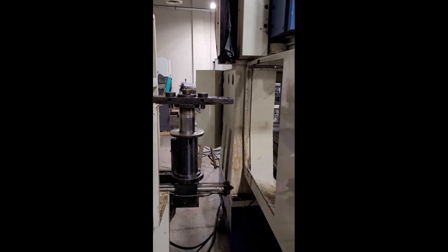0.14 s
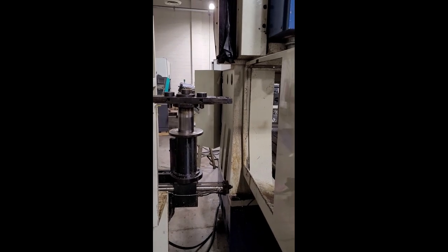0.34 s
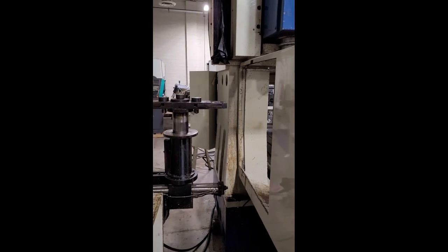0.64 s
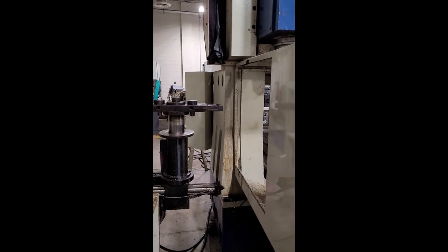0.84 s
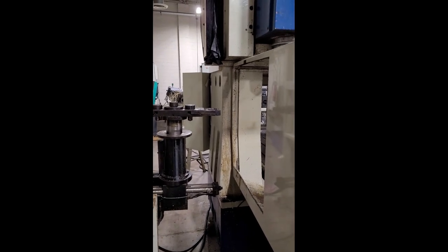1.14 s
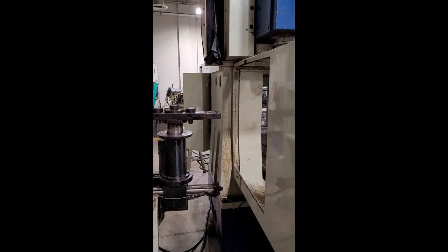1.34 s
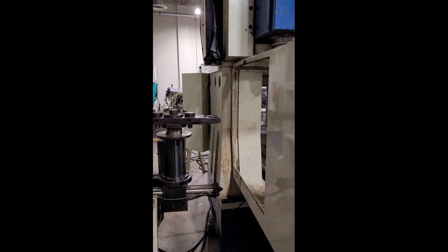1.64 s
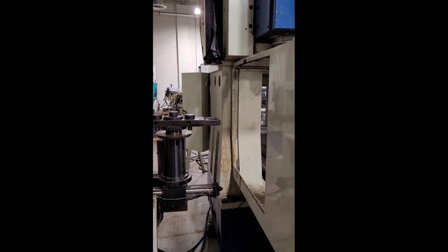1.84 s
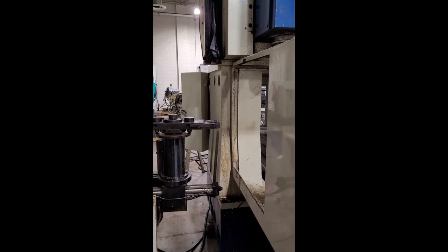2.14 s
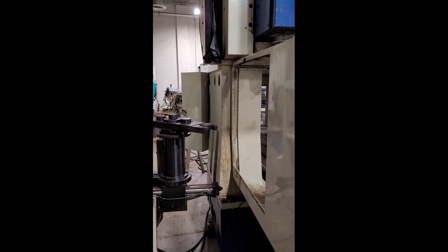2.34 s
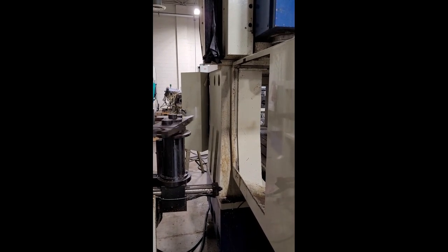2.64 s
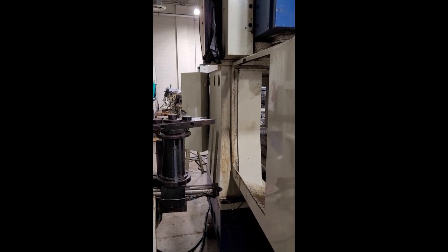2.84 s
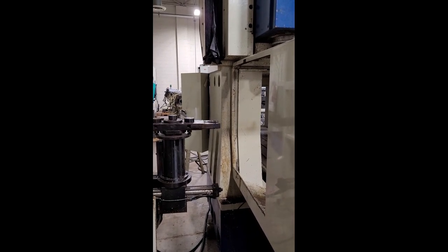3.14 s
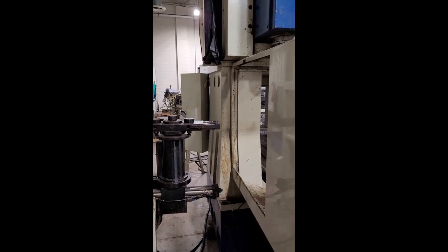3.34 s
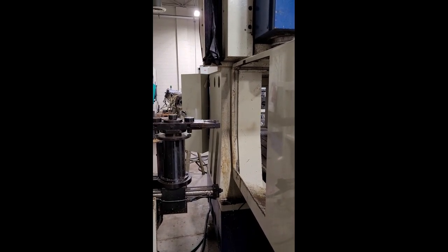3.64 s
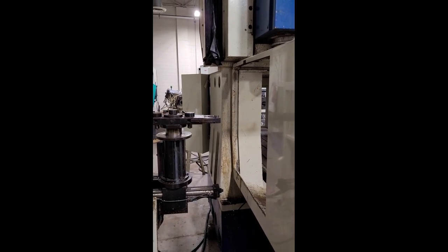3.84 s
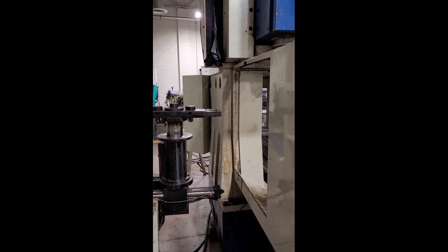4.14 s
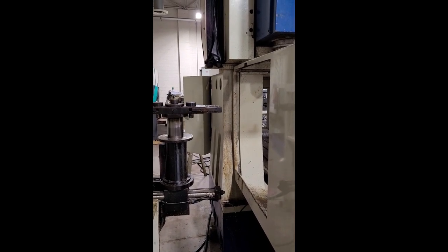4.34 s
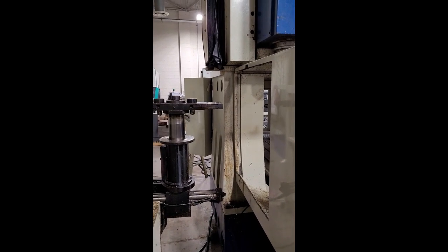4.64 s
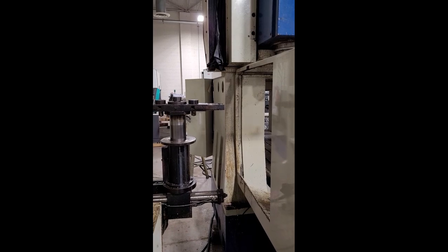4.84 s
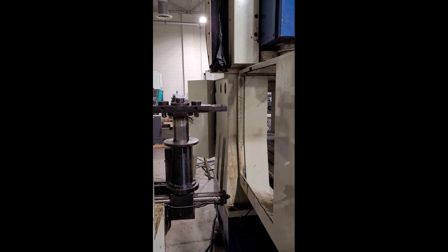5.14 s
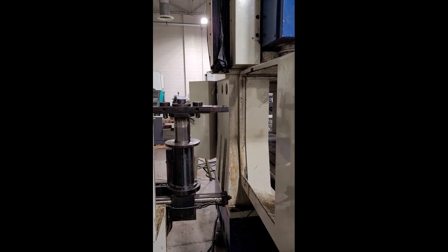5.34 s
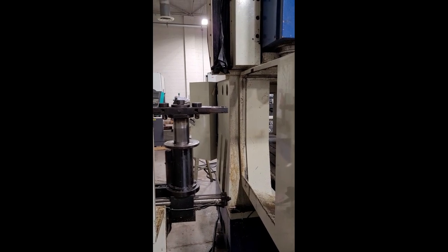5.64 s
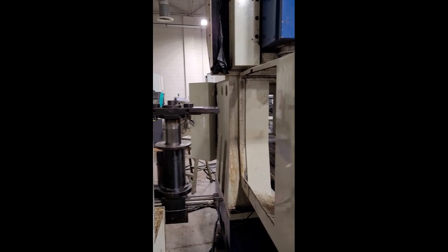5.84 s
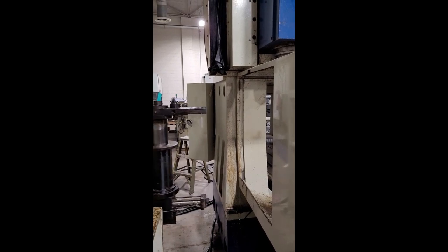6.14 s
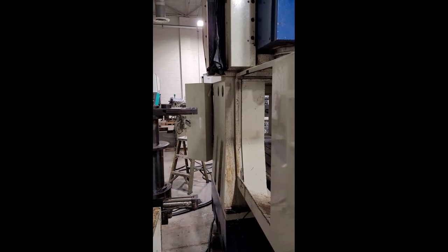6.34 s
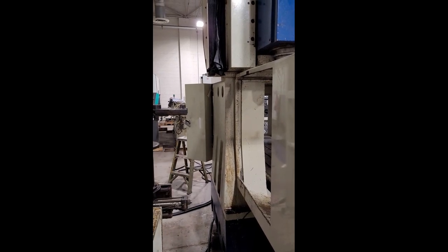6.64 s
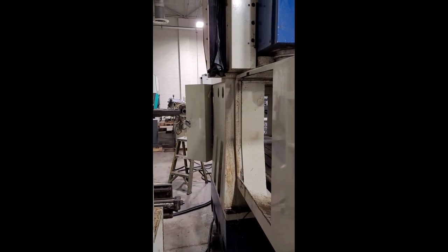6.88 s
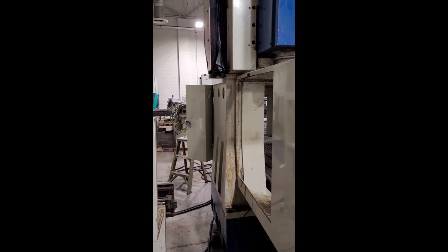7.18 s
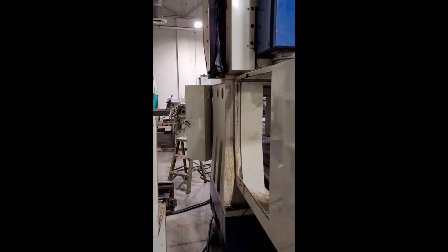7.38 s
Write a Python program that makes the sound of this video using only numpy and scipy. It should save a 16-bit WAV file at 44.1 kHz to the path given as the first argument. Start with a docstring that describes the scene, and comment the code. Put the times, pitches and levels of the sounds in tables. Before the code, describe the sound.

A machine changes tools, heard in close stereo over motor hum, low rumble and a faint air leak. Heavy metal clunks lead into a loud, bright hiss of compressed air. It shuts off, the pump whirrs, and steel snaps set off a second hiss. The arm knocks against its stops, the hum swells, and a short squeaky rattle and thud finish the cycle in the workshop.

```python
"""A workshop, with a hand-held stereo microphone close to a machining centre as it changes tools.
A hydraulic pump hums and whines throughout; the steel arm clunks against its stops and shakes the
cabinet. Twice a valve opens and compressed air blasts through the spindle taper.
At the end the carriage rattles home, squeaking on its rails."""
import sys
import numpy as np
from scipy import signal
from scipy.fft import rfft, irfft, next_fast_len
from scipy.io import wavfile
from scipy.ndimage import map_coordinates

SR = 44100
rng = np.random.default_rng(int(sys.argv[2]) if len(sys.argv) > 2 else 0)


def pcm_store(signal):
    """Save signal as 16-bit PCM."""
    levels = np.round(np.clip(np.atleast_2d(signal), -1, 1) * 32767)
    wavfile.write(sys.argv[1], SR, levels.astype(np.int16).T)


N = 331191


def amp(db):
    """Decibels to gain."""
    return 10 ** (np.asarray(db) / 20)


def unit(x):
    """Scale to rms 1."""
    return x / np.sqrt(np.mean(x ** 2) + 1e-20)


def along(points, hz):
    """Read (Hz, value) points on a log axis."""
    f, v = np.transpose(points)
    return np.interp(np.log(hz + 1), np.log(f + 1), v)


def wobble(rate):
    """A smooth random curve, rate knots a second."""
    knots = rng.standard_normal(1000)
    return map_coordinates(knots, [np.arange(N) * rate / SR], mode="wrap")


def filtered(x, response):
    """Shape x by a gain that depends on frequency."""
    n = x.shape[-1]
    m = next_fast_len(n + 4096)
    return irfft(rfft(x, m) * response(np.fft.rfftfreq(m, 1 / SR)), m)[..., :n]


def add(track, s, sound):
    """Mix a sound into a track at time s."""
    part = track[:, round(s * SR):][:, :sound.shape[-1]]
    part += sound[..., :part.shape[-1]]


# The two sides of the microphone. Each row: frequency in Hz, left-right likeness from 0 to 1.
LIKENESS = [(60, 0.96), (130, 0.96), (290, 0.87), (640, 0.65), (1410, 0.015), (3100, 0)]

def stereo_angle(hz):
    """Half the phase gap between left and right, in radians."""
    return np.arccos(np.clip(along(LIKENESS, hz), -1, 1)) / 2


def spread(pair):
    """Two unrelated signals become left and right: alike in the bass, unrelated in the treble."""
    mid, side = filtered(pair, lambda hz: np.array([np.cos(stereo_angle(hz)), np.sin(stereo_angle(hz))]))
    return np.array([mid + side, mid - side])


def noise(colour_db, size=N):
    """Stereo noise of rms 1 with a colour given in dB by frequency."""
    white = rng.standard_normal((2, size))
    return unit(spread(filtered(white, lambda hz: amp(colour_db(hz)))))


def tones(hz, overtones, drift, flutter_db):
    """Overtones of a drifting pitch; each flutters and reaches left and right in its own phase."""
    phase = 2 * np.pi * np.cumsum(hz * (1 + drift * wobble(5))) / SR
    out = np.zeros((2, N))
    for multiple, db in overtones:
        apart = stereo_angle(multiple * hz)
        start = rng.uniform(0, 2 * np.pi) + np.array([[apart], [-apart]])
        out += amp(db + flutter_db * wobble(13)) * np.sin(round(multiple) * phase + start)
    return np.sqrt(2) * out


# The background at the microphone. Each row: time in seconds, swell from 0 to 1.
BACKGROUND_SWELL = [(0, 0.7), (.2, 1), (.5, 0.04), (5.7, 0.06), (7.2, 0.86), (7.5, 1)]

def background_level():
    """Hum, rumble and hiss are louder at the start, sink, then swell toward the end."""
    times, swell = np.transpose(BACKGROUND_SWELL)
    return np.interp(np.arange(N) / SR, times, swell)


# Motor, gears and fan from close by. Each row: multiple of the fundamental, relative level in dB.
HUM_OVERTONES = [(1, -1), (2, -12.5), (3, -34)]
GEAR_OVERTONES = [(1, -1), (2, -15.5), (3, -18), (4, -26), (6, -19), (7, -22), (9, -33), (10, -23.5)]
FAN_OVERTONES = [(1, -7), (2, -13.5), (4, -37), (5, -16)]
# Load on the pump as the arm drops, swings, lifts and rolls home. Each row: start and end in seconds.
LOAD_STROKES = [(.6, 2.1), (2.28, 2.99), (3.8, 5.1), (6.25, 7.1)]
# Oil whirring through the valve under load. Each row: frequency in Hz, relative level in dB.
OIL_SPECTRUM = [(900, -30), (1500, -5), (1800, 1), (2150, -1.5), (2500, -16), (4000, -33)]
HUM_HZ, GEAR_HZ, FAN_HZ = 108.4, 354.1, 380.3
RASP_IDLE_DB, RASP_LOAD_DB, LOAD_RAMP_S = -58, -51.5, 0.12

def pump():
    """The motor hums, gears and cooling fan whine; load adds rasp and oil whirr."""
    t, swell = np.arange(N) / SR, background_level()
    hum_db = -33.5 + 5.5 * swell
    whine_db = -42.5 + 3.5 * swell
    hum = amp(hum_db) * tones(HUM_HZ, HUM_OVERTONES, drift=0.0048, flutter_db=0.93)
    gears = amp(whine_db) * tones(GEAR_HZ, GEAR_OVERTONES, drift=0.00111, flutter_db=2)
    fan = amp(whine_db - 4.5) * tones(FAN_HZ, FAN_OVERTONES, drift=0.00104, flutter_db=3.5)
    ramp = lambda s: np.clip((t - s) / LOAD_RAMP_S, 0, 1)
    load = sum(ramp(start) - ramp(end) for start, end in LOAD_STROKES)
    # under load the gears' fifth overtone stands out, blurred into a narrow rasp
    fifth = tones(GEAR_HZ, [(5, 0)], drift=.001, flutter_db=1.5)
    rasp_db = RASP_IDLE_DB + (RASP_LOAD_DB - RASP_IDLE_DB) * load
    rasp = amp(rasp_db) * unit(fifth * (1 + 0.55 * wobble(120)))
    whirr = amp(-55.5) * load * noise(lambda hz: along(OIL_SPECTRUM, hz))
    return hum + gears + fan + rasp + whirr


# Machinery around the microphone. Each row: frequency in Hz, relative level in dB.
RUMBLE_SPECTRUM = [(20, -28), (40, -5.5), (62, 5), (90, -1), (150, 3.5), (190, -2), (245, 3.5), (330, 0.5),
                   (430, -7), (600, -12), (900, -15), (2000, -18), (3000, -25), (8000, -49)]

def rumble():
    """The machinery rumbles, louder at the start and the end."""
    level_db = -36.5 + 5.5 * background_level() + 0.18 * wobble(9)
    return amp(level_db) * noise(lambda hz: along(RUMBLE_SPECTRUM, hz))


def panels(x, share, reach_s, count=12):
    """Nearby sheet metal sends weak early copies to the microphone and combs the spectrum."""
    echoes = np.zeros((2, SR // 10))
    for side in echoes:
        delays = rng.uniform(.001, reach_s, count)
        side[(delays * SR).astype(int)] = share * rng.choice([-1, 1], count) / np.sqrt(count)
    echoes[:, 0] = 1
    return signal.fftconvolve(x, echoes, axes=1)[:, :N] / np.sqrt(1 + share ** 2)


# Hiss of the air line. Each row: frequency in Hz, relative level in dB.
LEAK_SPECTRUM = [(500, -6), (1500, -11), (3500, 1.5), (4300, 0), (7400, 0.5), (8700, -6), (9600, -5),
                 (11000, 0), (13500, -0.5), (15500, 1.5)]
HISS_DIP_DB, HISS_RECOVER_S = 4, 0.32
VENT_S, VENT_RISE_S, VENT_DB = 7.32, .04, -34.5

def air_leak():
    """The air line leaks throughout; at home the carriage's cylinder vents softly."""
    t = np.arange(N) / SR
    # the background hiss dips with each blast and swells back afterwards
    dip = sum((t > opens) * np.exp(-np.maximum(t - shuts, 0) / HISS_RECOVER_S)
              for opens, _, shuts, *_ in AIR_BLASTS)
    leak = amp(-44.5 + 4.3 * background_level() - HISS_DIP_DB * dip)
    vent = amp(VENT_DB) * np.clip((t - VENT_S) / VENT_RISE_S, 0, 1)
    hiss = np.hypot(leak, vent) * noise(lambda hz: along(LEAK_SPECTRUM, hz))
    return panels(hiss, share=0.43, reach_s=0.012)


# The workshop around the machine. Each row: frequency in Hz, time to fall 60 dB in seconds.
WORKSHOP_DECAY = [(100, 0.98), (500, 0.56), (2000, 0.82), (6000, 0.49), (15000, 0.076)]

def room(x, wet_db):
    """Add the workshop's answer, which dies sooner in the treble."""
    hz, t, spectrum = signal.stft(rng.standard_normal((2, SR // 2)), SR, nperseg=256)
    decay = amp(-60 * t / along(WORKSHOP_DECAY, hz)[:, None])
    tail = spread(signal.istft(spectrum * decay, SR, nperseg=256)[1])
    answer = signal.fftconvolve(x, tail / np.linalg.norm(tail[0]), axes=1)[:, :x.shape[-1]]
    return x + amp(wet_db) * answer


# The cabinet's modes. Each row: frequency in Hz, relative level in dB, time to fall 60 dB in seconds.
CABINET_MODES = [(40, -4, 0.2), (72, 14.5, 0.24), (121, 3, 0.55), (174, 4, 0.24), (240.6, -0.5, 0.25),
                 (275.4, 1, 0.16), (323.2, -1, 0.34), (350.6, -4.5, 0.4), (387.6, -4.5, 0.26),
                 (431, -6, 0.18), (465, -2.5, 0.21), (531.6, -5.5, 0.32), (644, -11, 0.22),
                 (732, -3.5, 0.24), (857, -5.5, 0.26), (997, -4.5, 0.3)]

def cabinet_thud(t, centre_hz, scatter_db=2.5, detune=0.019):
    """The place of a blow picks the modes near centre_hz, a little differently each time."""
    hz, db, t60 = np.transpose(CABINET_MODES)[:, :, None]
    size, turn, skew, shift = rng.standard_normal((4, len(CABINET_MODES), 1))
    gain = amp(db - 9 * np.log2(hz / centre_hz) ** 2 + scatter_db * size)
    apart = np.sign(skew) * stereo_angle(hz)
    fading = gain * amp(-60 * t / t60) / np.sqrt(np.sum(gain ** 2) / 2)
    phase = 2 * np.pi * hz * (1 + detune * shift) * t + np.pi * turn
    return np.array([np.sum(fading * np.sin(phase + side * apart), axis=0) for side in (1, -1)])


def clang(clusters, t, t60, damping=0.24):
    """Close modes in steel beat against each other as they fade; the high ones die first."""
    grid = np.fft.rfftfreq(len(t), 1 / SR)
    strike = rfft(rng.standard_normal((2, len(t))))
    out, power = np.zeros((2, len(t))), 0
    for hz, width, db in clusters:
        band = amp(db) * irfft(strike / (1 + (2 * (grid - hz) / width) ** 2), len(t))
        power += np.mean(band ** 2)
        out += band * amp(-60 * t / t60 * (hz / 2000) ** damping)
    return out / np.sqrt(power)


# Loose parts clashing close by. Each row: frequency in Hz, relative level in dB.
CLASH_SPECTRUM = [(150, -40), (500, 1), (1100, 3.5), (2000, 1.5), (3200, -7.5), (4200, -5.5), (6700, 2),
                  (9000, -1), (12800, 3), (15500, -18)]

def knocks(blows, clusters, attack_s, t60):
    """Each blow thuds in the cabinet, clashes in loose parts and rings the steel that was struck."""
    out, t = np.zeros((2, N)), np.arange(SR // 2) / SR
    for s, thud_db, thud_hz, clash_db, corner_hz, ring_db in blows:
        swell = 1 - np.exp(-t / np.hypot(attack_s, .002))  # heavy panels take a moment to move
        thud = amp(thud_db) * cabinet_thud(t, thud_hz) * swell
        # softer contact leaves out the treble of the clash
        colour_db = lambda hz: along(CLASH_SPECTRUM, hz) - 10 * np.log10(1 + (hz / corner_hz) ** 4)
        clash = amp(clash_db) * noise(colour_db, len(t)) * amp(-60 * t / t60)
        steel = amp(ring_db) * clang(clusters, t, t60)
        metal = (clash + steel) * (1 - np.exp(-t / attack_s))
        add(out, s, room(thud, wet_db=-9.5) + room(metal, wet_db=-13.0))
    return out


# Mode clusters of the steel arm. Each row: centre in Hz, width in Hz, relative level in dB.
ARM_CLUSTERS = [(1210, 100, 0.5), (1782, 70, 9), (2100, 230, 1.5), (2580, 200, 1.5), (3080, 110, 3),
                (3430, 190, 0), (3736, 66, 3), (4220, 320, -2), (5800, 680, -3), (7840, 770, -6)]
# Bare steel on steel. Each row: start in seconds, clash level in dB, treble corner in Hz, ring in dB.
STEEL_SNAPS = [(.117, -25, 5000, -23), (.343, -19.5, 12500, -40), (0.475, -23.5, 9000, -50),
               (3.577, -17, 10900, -32), (3.650, -27, 9000, -50), (5.614, -21, 1170, -39),
               (5.632, -40, 1500, -20), (5.647, -28.5, 4000, -22)]

def clacks(thud_hz=292):
    """Grippers, latches and the air valve snap home in single bright blows."""
    blows = [(s, db - 1, thud_hz, db, corner_hz, ring_db) for s, db, corner_hz, ring_db in STEEL_SNAPS]
    return knocks(blows, ARM_CLUSTERS, attack_s=0.0026, t60=0.17)


# Heavy arrivals. Each row: start in seconds, thud level in dB, thud centre in Hz, clash level in dB.
STOP_HITS = [(.150, -12, 520, -26), (.349, -24, 368, -25), (2.128, -21.5, 346, -29), (3.588, -18, 370, -26),
             (3.662, -17.5, 363, -30), (4.598, -15.5, 335, -33), (5.097, -24, 400, -29),
             (5.204, -26, 480, -33), (5.507, -28, 306, -39), (5.655, -23.5, 225, -34),
             (7.408, -17.5, 72, -39)]
REBOUND_S, REBOUND_SHRINK = .031, .75  # first flight off a stop; each flight over the one before

def stops(contacts=3, corner_hz=1430):
    """Arm or carriage hits a cushioned stop and rebounds, each contact sooner, softer and deeper."""
    blows = []
    for s, thud_db, thud_hz, clash_db in STOP_HITS:
        for k in range(contacts):
            contact_db = clash_db - 6 * k
            ring_db = contact_db - 9
            blows.append((s, thud_db - 4.5 * k, thud_hz * 0.85 ** k, contact_db, corner_hz, ring_db))
            s += REBOUND_S * REBOUND_SHRINK ** k
    return knocks(blows, ARM_CLUSTERS, attack_s=0.0061, t60=0.2)


# Air through the spindle taper, close to the microphone. Each row: valve opening, start of the surge's
# fade and valve shutting in seconds, jet and surge levels in dB, sag of the jet in dB per second.
AIR_BLASTS = [(0.474, .54, 2.136, -20, -15, 0.87), (3.648, 3.76, 5.11, -20, -17, 1)]
# Colours of the jet and the surge. Each row: frequency in Hz, relative level in dB.
JET_SPECTRUM = [(100, -33), (400, -14.5), (730, -5.5), (900, -11), (1250, -3), (1600, -4.5), (2100, -2),
                (4000, -2), (5300, 1.5), (7300, 2.5), (8900, -4.5), (11500, 0), (13500, -4), (16000, -3.5)]
SURGE_SPECTRUM = [(200, -10), (900, -5.5), (2000, -2.5), (5500, -4.5), (7300, 2), (9000, -2.5), (11500, 3),
                  (13500, 0.5), (16000, -3.5)]
# Cavity resonances that colour the jet. Each row: centre in Hz, width in Hz, boost in dB.
CAVITY_PEAKS = [(1136, 20, 11.5), (2060, 180, 3), (4640, 60, 2.5), (6100, 120, 0.5), (6440, 90, 3),
                (7040, 48, 9), (7800, 80, 8)]

def air_blasts(open_s=.002, shut_db_per_s=260, fade_db_per_s=59):
    """The valve dumps the line's pressure in a bright surge, then a steady jet blows until it shuts."""
    t = np.arange(N) / SR
    flow, burst = np.zeros(N), np.zeros(N)
    for opens, fades, shuts, jet_db, surge_db, sag in AIR_BLASTS:
        age = np.maximum(t - opens, 0)
        valve = (1 - np.exp(-age / open_s)) * amp(-shut_db_per_s * np.maximum(t - shuts, 0))
        swell = 1 - .5 * np.exp(-age / 0.019)
        flow += valve * amp(jet_db - sag * age)
        burst += valve * swell * amp(surge_db - fade_db_per_s * np.maximum(t - fades, 0))
    cavity_db = lambda hz: sum(db / (1 + (2 * (hz - centre) / width) ** 2)
                               for centre, width, db in CAVITY_PEAKS)
    jet = flow * noise(lambda hz: along(JET_SPECTRUM, hz) + cavity_db(hz))
    surge = burst * noise(lambda hz: along(SURGE_SPECTRUM, hz))
    turbulence = amp(0.48 * wobble(30))
    return room(panels(turbulence * (jet + surge), share=0.49, reach_s=.02), wet_db=-12.5)


# The carriage jolts at the end of its rails. Each row: start in seconds, clash level in dB.
JOLTS = [(7.182, -28.5), (7.245, -24), (7.274, -23), (7.321, -31.5), (7.364, -35), (7.422, -30),
         (7.461, -36.5)]
# Mode clusters of the carriage. Each row: centre in Hz, width in Hz, relative level in dB.
CARRIAGE_CLUSTERS = [(650, 34, 9.5), (940, 35, 2.5), (1220, 44, 4), (1360, 30, 4), (1690, 59, 5),
                     (1776, 36, 3), (2250, 45, 0), (3090, 100, -4), (3740, 390, -6), (5220, 40, -10),
                     (6540, 50, -10), (7400, 260, -11)]
CHATTER_S, CHATTER_DB = .021, -7.5  # typical gap and relative level of the contacts after a jolt

def rattle(count=3, thud_hz=270, corner_hz=3140):
    """Each jolt of the carriage sets its loose parts chattering at uneven gaps."""
    contacts = list(JOLTS)
    for s, db in JOLTS:
        gaps, sizes = rng.standard_normal((2, count))
        times = s + np.cumsum(CHATTER_S * np.exp(.3 * gaps))
        contacts += zip(times, db + CHATTER_DB + 1.5 * sizes)
    blows = [(s, db + 2.5, thud_hz, db, corner_hz, db - 3) for s, db in contacts]
    return knocks(blows, CARRIAGE_CLUSTERS, attack_s=0.0013, t60=0.28)


# Squeaks from the rails. Each row: start and end in seconds, pitch in Hz, level in dB.
RAIL_SQUEAKS = [(7.19, 7.278, 5080, -44), (7.32, 7.40, 6160, -41), (7.30, 7.44, 1690, -39.5)]

def squeaks():
    """The braking carriage rubs on its rails: brief, unsteady squeaks."""
    t, out = np.arange(N) / SR, np.zeros((2, N))
    for start, end, hz, db in RAIL_SQUEAKS:
        progress = np.clip((t - start) / (end - start), 0, 1)
        rub = np.sqrt(np.abs(np.sin(np.pi * progress)))
        tone = tones(hz, [(1, 0)], drift=0.00298, flutter_db=4.0)
        out += amp(db) * rub * tone * (1 + .5 * wobble(120))
    return room(out, wet_db=-9)


# The balance at the microphone. Each row: frequency in Hz, left minus right in dB.
BALANCE = [(60, 0), (300, -2.5), (700, 0.5), (1300, -3.5), (2400, -2), (4400, 0.5), (15000, 1)]

def scene():
    """The whole machine from close by, a little stronger on the right in the bass and middle."""
    left, right = pump() + rumble() + air_leak() + air_blasts() + stops() + clacks() + rattle() + squeaks()
    return np.array([filtered(left, lambda hz: amp(along(BALANCE, hz) / 2)),
                     filtered(right, lambda hz: amp(-along(BALANCE, hz) / 2))])


TOP_HZ = 15850

def record(dry):
    """The hand-held recorder keeps nothing above its band limit."""
    return filtered(dry, lambda hz: hz < TOP_HZ)


dry = scene()
out = record(dry)
pcm_store(out)
```